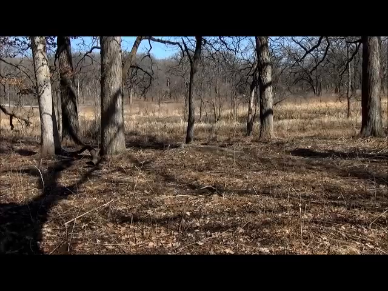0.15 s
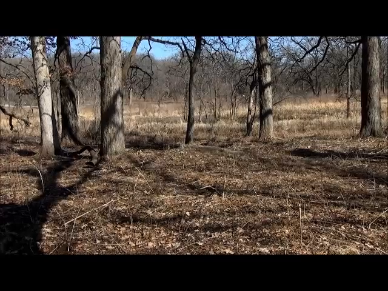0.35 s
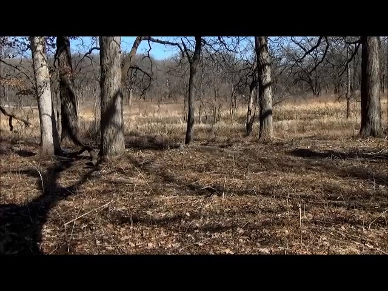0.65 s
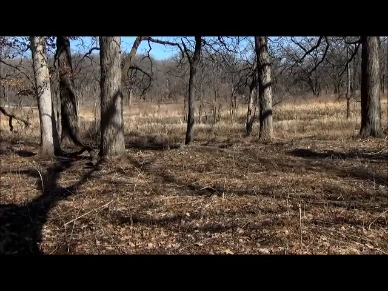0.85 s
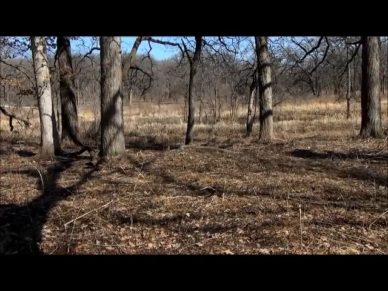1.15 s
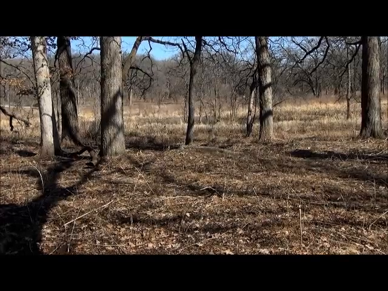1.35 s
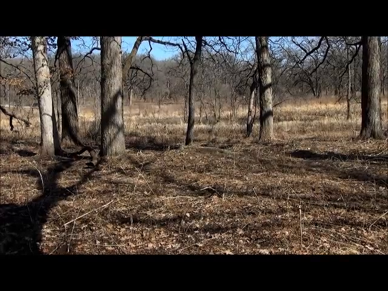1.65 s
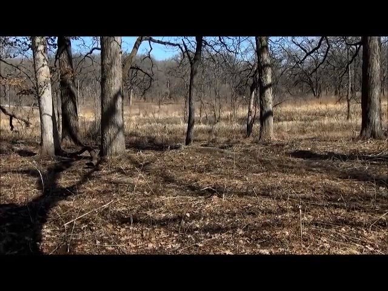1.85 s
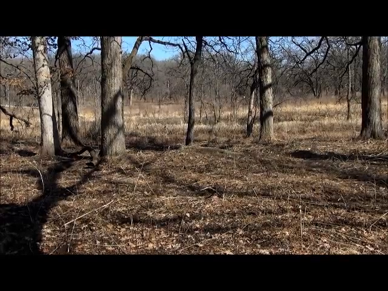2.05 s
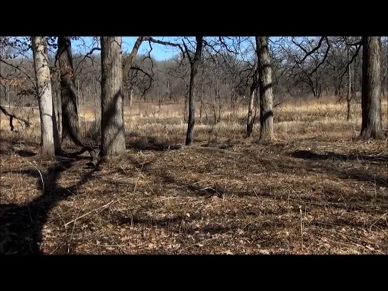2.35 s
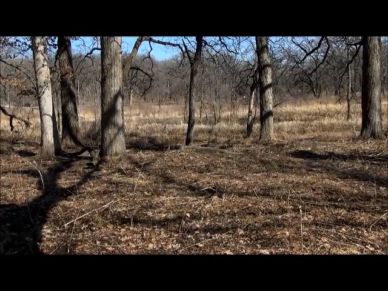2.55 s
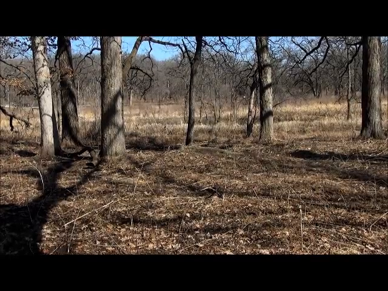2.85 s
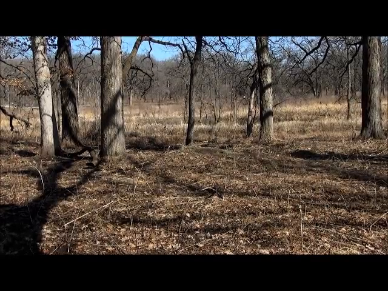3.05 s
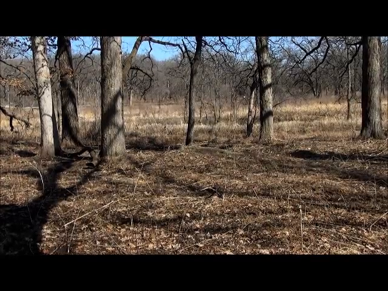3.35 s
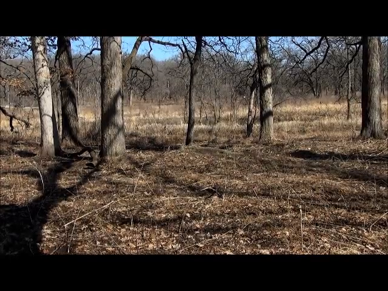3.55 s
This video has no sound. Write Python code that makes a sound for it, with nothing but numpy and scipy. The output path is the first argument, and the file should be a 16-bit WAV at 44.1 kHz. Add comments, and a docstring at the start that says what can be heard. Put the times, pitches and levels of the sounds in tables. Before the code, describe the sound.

Frogs trill in a dense, creaky chorus over a faint rumble of distant traffic.

```python
"""Chorus frogs call from a marsh beyond a bare wood. Each call is a trill of short throat pulses,
mostly climbing in pitch; a few near frogs stand out of a far crowd, scattered by the trees.
Leaf litter ticks twice. Distant traffic rumbles and its tyres sing faintly, over a low hiss."""
import sys
import numpy as np
from scipy import signal
from scipy.fft import rfft, irfft
from scipy.io import wavfile
from scipy.ndimage import uniform_filter1d, minimum_filter1d

SR = 44100
rng = np.random.default_rng(int(sys.argv[2]) if len(sys.argv) > 2 else 0)


def unload_wav(signal):
    """Save mono or channel-first audio to the path in sys.argv[1] as 16-bit WAV at rate SR, clipped to [-1, 1]."""
    wavfile.write(
        sys.argv[1],
        SR,
        np.round(np.clip(np.atleast_2d(signal).T, -1, 1) * 32767).astype(np.int16),
    )


N = 163611
T = np.arange(N) / SR

# Near trills: start_s, spacing_ms, slowing_ms_per_pulse, pulse_count, pitch_hz, rise_hz_per_pulse,
# level_db, overtones_db
TRILLS = [ (.001, 47, .15, 6, 3596, 18, -14.5, -2), (.112, 42.6, .3, 5, 3560, 40, -14.5, 1),
          (.245, 36.4, -.15, 12, 3052, 46, -13.5, 2), (.441, 39, .3, 7, 3516, 31, -16, 0),
          (.578, 39, .15, 7, 3606, 11.5, -15.5, 1.5), (.598, 44.1, 0, 7, 3543, 3, -16, 5.5),
          (1.091, 51, 0.063, 5, 3690, 28, -16, 2), (1.330, 45, 0.1, 7, 3566, 0, -14, 0),
          (1.643, 46.5, -.15, 16, 3550, -1.5, -16, 4.5), (1.867, 39, .3, 10, 3038, 46.5, -15.5, 3),
          (1.922, 44, -0.028, 6, 3785, 9, -18, -4), (1.980, 46.4, 0.038, 6, 3444, -3.5, -19, 7),
          (2.098, 45.6, 0.017, 7, 3436, -2, -14, 7), (2.402, 40.67, 0.13, 16, 3410, 18.5, -17.5, 5.5),
          (2.545, 47.25, .15, 10, 3393, 45, -15.5, 4.5), (2.752, 41.75, .15, 14, 3246, 23, -17, 3),
          (3.020, 43, 0.056, 14, 2770, 3.5, -27.5, -1), (3.045, 40.25, 0.18, 13, 2898, 1, -20.5, 3),
          (3.069, 36.4, 0.17, 10, 2870, 46, -16, 8), (3.179, 42.5, -.15, 10, 3160, 37, -14.5, 4.5),
          (3.420, 52, -0.025, 6, 3570, 3, -17, 0.5)]
# Single loud pulses: peak_s, level_db, pitch_hz
LOUD_PULSES = [(0.0451, -3, 3455), (0.0707, -4, 3600), (0.1133, -8, 3540), (0.1322, -2.5, 3570),
               (0.1489, -9.5, 3480), (0.1899, -0.5, 3460), (0.2296, -3, 3430), (0.2779, -2.9, 3330),
               (0.4214, 1, 3260), (0.4534, -3, 3380), (0.4657, 0, 3350), (0.486, -2.2, 3374),
               (0.5632, -4.5, 3460), (0.6014, -0.5, 3380), (0.6205, -8, 3600), (0.6429, -6, 3450),
               (0.6685, -9, 3620), (0.7268, -3.5, 3420), (0.7728, 1, 3570), (1.0852, -3, 3310),
               (1.1496, -4.5, 3420), (1.2131, -3, 3380), (1.2937, -11, 3560), (1.3195, -3, 3470),
               (1.3655, -4, 3410), (1.4149, -2.5, 3390), (1.4502, -2, 3540), (1.743, -1, 3350),
               (1.7646, -6.4, 3430), (1.7882, -4.5, 3520), (1.8245, -0.5, 3590), (1.8687, -6, 3050),
               (1.903, -3, 3130), (1.9851, -4.6, 3244), (2.0304, -3.3, 3267), (2.0633, 4, 3306),
               (2.0797, -4, 3310), (2.1011, 3.5, 3480), (2.1451, -2, 3296), (2.2128, -3, 3430),
               (2.2802, -13, 3346), (2.3272, -0.5, 3497), (2.4023, -5, 3425), (2.4427, 0, 3450),
               (2.4836, -3.5, 3440), (2.5446, -7.5, 3260), (2.5652, -6, 3270), (2.5918, -13, 3320),
               (2.6407, 1, 3260), (2.7068, -4, 3420), (2.7758, -2.6, 3310), (2.8238, 0, 3460),
               (2.8785, -1, 3510), (2.9238, -5.5, 3480), (2.9696, -7.5, 3420), (2.99, -5, 3440),
               (3.0604, -6, 3290), (3.1501, -4, 3170), (3.1783, -9, 3340), (3.2222, 3, 3410),
               (3.2638, -2.5, 3240), (3.2752, -3, 3290), (3.292, -6, 3385), (3.3066, -5, 3444),
               (3.3578, -6, 3330), (3.3689, -8, 3320), (3.3939, 2.5, 3440), (3.4141, 1.5, 3640),
               (3.4317, -4, 3420), (3.462, -2.5, 3330), (3.5129, -2, 3550), (3.556, -0.5, 3530)]


def near_frogs(trill_gain_db=5, loud_gain_db=-3.5):
    """Regular trills and single loud pulses, lightly scattered by the wood."""
    rows = [(peak_s, db + loud_gain_db, hz, 0) for peak_s, db, hz in LOUD_PULSES]
    for start_s, spacing_ms, slowing_ms, count, hz, rise_hz, db, overtones_db in TRILLS:
        for k in range(count):
            delay_s = (spacing_ms * k + slowing_ms * k * k / 2) / 1000
            rows.append((start_s + delay_s, db + trill_gain_db, hz + rise_hz * k, overtones_db))
    return wood(throat_pulses(rows), wet_db=-14)


# Weak partials beside the one the throat sac favours: pitch_ratio, level_db
PARTIALS = [(0.502, -28.5), (1.55, -32), (2, -44), (2.5, -51.5)]
# Throat rasp spectrum: frequency_hz, level_db
RASP_SPECTRUM = [(2000, -19), (2500, -1), (4300, -3), (5200, -1), (6800, -6), (8000, -22), (11000, -22),
                 (15000, -33)]


def throat_pulses(rows, rise_s=.0032, sag_hz_per_s=46000, sag_spread=.4, rasp_db=-34.5):
    """Raspy pulses that swell, sag in pitch and die. Rows: peak_s, level_db, pitch_hz, overtones_db."""
    t = np.arange(1, 700) / SR
    fade_out = np.minimum(1, (t[-1] - t) / rise_s)
    shape = (t / rise_s * np.exp(1 - t / rise_s)) ** 4.55 * fade_out
    sag_cycles = sag_hz_per_s * (t - rise_s) ** 2 / 2
    tone, rasp_power = np.zeros(N), np.zeros(N)
    for peak_s, level_db, hz, overtones_db in rows:
        offset_cycles, bend = rng.uniform(-1.073, 1, 2)
        phase = 2 * np.pi * (hz * t - sag_cycles * (1 + sag_spread * bend) + offset_cycles)
        envelope = from_db(level_db) * shape
        brightness = from_db(overtones_db)
        partials = sum(from_db(db) * np.sin(ratio * phase) for ratio, db in PARTIALS)
        start = int((peak_s - rise_s) * SR)
        add(tone, envelope * (np.sin(phase) + brightness * partials), start)
        add(rasp_power, (envelope * brightness) ** 2, start)
    return tone + from_db(rasp_db) * np.sqrt(rasp_power) * noise(RASP_SPECTRUM)


# Far chorus loudness: time_s, level_db
CHORUS_LEVEL = [(0.0, -17), (0.31, -20.5), (0.62, -18.5), (0.78, -20), (1.31, -19.5), (1.75, -20.5),
                (1.98, -17), (2.25, -21), (2.45, -20), (2.71, -17.5), (3.04, -20.5), (3.35, -16),
                (3.52, -23), (3.71, -24)]


def far_frogs(trills_per_s=36, pulse_count=15, spacing_s=.045, rise_hz=22.3, overtones_db=2, gain_db=1):
    """Overlapping trills from four groves, each frog with its own pitch, pace and distance."""
    groves = [[] for _ in range(4)]
    k = np.arange(pulse_count)
    for i, start_s in enumerate(np.arange(-1, N / SR, 1 / trills_per_s)):
        lag, pace, pitch, nearness = rng.standard_normal(4)
        times_s = start_s + spacing_s * (lag + k * (1 + .08 * pace))
        deep_voice = i % 6 == 0
        voice_hz, spread_hz, voice_db = (3044, 46, -3.5) if deep_voice else (3341.7, 131, 0)
        pitches_hz = voice_hz + spread_hz * np.clip(pitch, -1.7, 1.7) + rise_hz * (k - k.mean())
        db = voice_db + np.clip(nearness, -2, 2)
        trill = [(s, db, hz, overtones_db) for s, hz in zip(times_s, pitches_hz) if 0 < s < N / SR]
        groves[i % len(groves)] += trill
    chorus = sum(wood(throat_pulses(rows), wet_db=-4.5) for rows in groves)
    running_rms = np.sqrt(uniform_filter1d(chorus[0] ** 2, size=SR // 16) + 1e-12)
    return from_db(gain_db) * level(CHORUS_LEVEL) * chorus / running_rms


def wood(x, wet_db, t60_s=.36, side_db=-17.5):
    """Trunks scatter the sound into a short diffuse tail, nearly alike in both ears."""
    t = T[:SR // 2]
    mid, side = rng.standard_normal((2, len(t))) * from_db(-60 * t / t60_s)
    tail = (mid + from_db(side_db) * side * [[1], [-1]]) / np.sqrt(np.sum(mid ** 2))
    return x + from_db(wet_db) * irfft(rfft(x) * rfft(tail, N), N)


# Dry ticks: peak_s, level_db, centre_hz, half_width_s
TICKS = [(2.231, -27, 4300, .003), (2.42, -50, 10800, .006)]


def leaf_litter():
    """Short bursts of dry crackle from twigs and leaves."""
    ticks = np.zeros(N)
    for peak_s, db, hz, half_width_s in TICKS:
        envelope = np.exp(-((T - peak_s) / half_width_s) ** 2)
        band = [(hz / 4, -54), (hz / np.sqrt(2), -18), (hz, 0), (hz * np.sqrt(2), -18), (hz * 4, -54)]
        ticks += from_db(db) * envelope * noise(band)
    return ticks


# Road roar loudness: time_s, level_db
ROAR_LEVEL = [(0.0, -23), (0.41, -24.5), (0.52, -22.5), (0.85, -26.5), (1.89, -24.5), (1.98, -22.5),
              (2.16, -25), (2.58, -23.5), (2.99, -22.5), (3.19, -21), (3.58, -27), (3.71, -26)]
# Road roar spectrum, body and top: frequency_hz, level_db
ROAR_BODY = [(53, -34), (90, -4.5), (128, -1), (236, -4.5), (353, -1.5), (397, -3.5), (532, -1),
             (674, -3.5), (1070, -8), (1500, -17), (1950, -47), (3300, -120)]
ROAR_TOP = [(1720, -14), (2000, -21), (2300, -30.5), (2600, -24.5), (4000, -50)]
# Engine rumble loudness: time_s, level_db
RUMBLE_LEVEL = [(0.0, -39), (0.06, -37.5), (1.7, -39), (1.88, -41), (1.91, -32.5), (1.99, -38.5),
                (2.23, -35.5), (2.4, -36.5), (2.5, -30.5), (2.63, -40), (2.82, -32.5), (2.86, -36),
                (3.21, -31), (3.71, -45)]
# Engine rumble spectrum: frequency_hz, level_db
RUMBLE_SPECTRUM = [(20, -15), (35, -6.5), (48, 1), (62, 11.5), (75, 6), (95, -7.5), (140, -44.5)]
# Stereo tilt, scaled per ear: frequency_hz, leftward_db
ROAD_BALANCE = [(30, 4), (65, -7), (160, -1), (350, -2.5), (700, -3.1), (1400, -1.2), (4000, 0.5)]


def traffic(side_db=-21):
    """Road roar, deep engine rumble and tyre whines, a little to the right."""
    roar_spectrum = [(40, -16)] + [(hz, db) for hz, db in ROAR_BODY if 85 < hz < 1550] + ROAR_TOP
    roar = level(ROAR_LEVEL) * noise(roar_spectrum)
    rumble = level(RUMBLE_LEVEL) * noise(RUMBLE_SPECTRUM)
    mid = roar + rumble + tyre_whines()
    side = from_db(side_db) * level(ROAR_LEVEL) * noise(roar_spectrum)
    left = colour(mid + side, ROAD_BALANCE, db_scale=.61)
    right = colour(mid - side, ROAD_BALANCE, db_scale=-.58)
    return np.array([left, right])


# Tyre whines: start_s, length_s, pitch_hz, level_db
WHINES = [(0.413, 0.34, 341, -28), (0.477, 0.31, 566.6, -33), (1.184, 0.19, 547, -37),
          (1.509, 0.13, 543, -32), (1.88, 0.19, 508, -32.5), (2.35, .5, 520, -32.5),
          (2.32, 0.34, 572, -32.5)]


def tyre_whines(width_hz=12):
    """Tyres sing in brief swells of narrow-band noise."""
    skirt = [(-2 * width_hz, -70), (-width_hz, -12), (0, 0), (width_hz, -12), (2 * width_hz, -70)]
    whines = np.zeros(N)
    for start_s, length_s, pitch_hz, level_db in WHINES:
        progress = np.clip((T - start_s) / length_s, 0, 1)
        swell = np.sqrt(np.sin(np.pi * progress).clip(0))
        band = [(pitch_hz + offset_hz, db) for offset_hz, db in skirt]
        whines += from_db(level_db) * swell * noise(band)
    return whines


# Hiss spectrum: frequency_hz, level_db
HISS_SPECTRUM = [(1500, 4), (2500, -6), (4500, 2), (7000, -9), (9000, -11), (12000, -26), (15500, -21)]


def hiss(level_db=-47.5):
    """Faint steady noise, alike in both ears."""
    return from_db(level_db) * noise(HISS_SPECTRUM)


def from_db(db):
    """Decibels to gain."""
    return 10 ** (np.asarray(db) / 20)


def level(points):
    """Gain over time from points of time_s, level_db."""
    return from_db(np.interp(T, *np.transpose(points)))


def colour(x, spectrum, db_scale=1):
    """Filter by a curve of frequency_hz, level_db."""
    hz, db = np.transpose(sorted(spectrum))
    bins_hz = np.maximum(np.arange(N // 2 + 1) * SR / N, 1)
    curve_db = np.interp(np.log(bins_hz), np.log(hz), db)
    return irfft(rfft(x) * from_db(db_scale * curve_db), N)


def noise(spectrum):
    """Coloured noise of rms 1."""
    x = colour(rng.standard_normal(N), spectrum)
    return x / np.sqrt(np.mean(x ** 2) + 1e-20)


def add(out, x, start):
    """Mix x in from sample start, cut at the edges."""
    a, b = max(start, 0), min(start + len(x), N)
    if b > a:
        out[a:b] += x[a - start:b - start]


def scene(frog_pan_db=1.5):
    """Frogs, slightly right, over leaf litter, traffic and hiss."""
    frogs = (near_frogs() + far_frogs()) * from_db([[-frog_pan_db / 2], [frog_pan_db / 2]])
    return frogs + leaf_litter() + traffic() + hiss()


def record(dry, ceiling=.93, window_s=.004, cutoff_hz=15700):
    """A fast limiter holds the loudest pulses below full scale; the top is cut steeply."""
    window = int(window_s * SR)
    needed_gain = ceiling / np.maximum(np.abs(dry).max(axis=0), ceiling)
    held_gain = minimum_filter1d(needed_gain, size=2 * window)
    smooth_gain = uniform_filter1d(uniform_filter1d(held_gain, size=window), size=window)
    lowpass = signal.ellip(10, .1, 80, cutoff_hz, fs=SR, output="sos")
    return signal.sosfilt(lowpass, dry * smooth_gain)


dry = scene()
out = record(dry)
unload_wav(out)
```